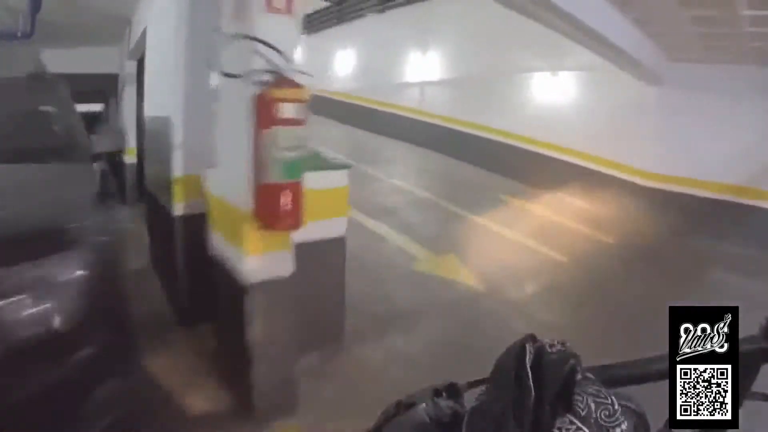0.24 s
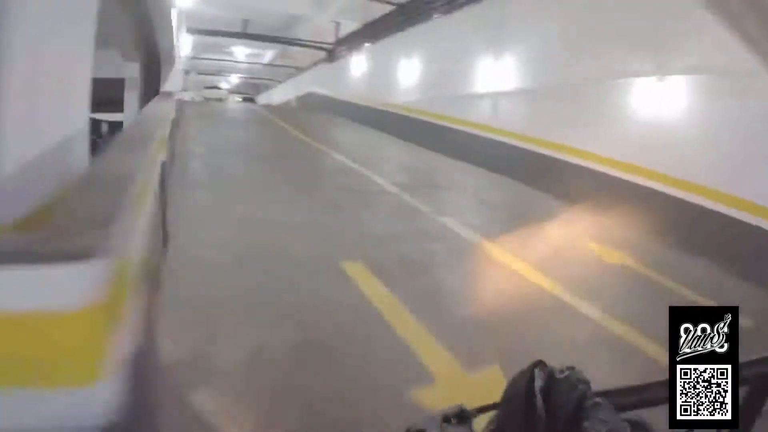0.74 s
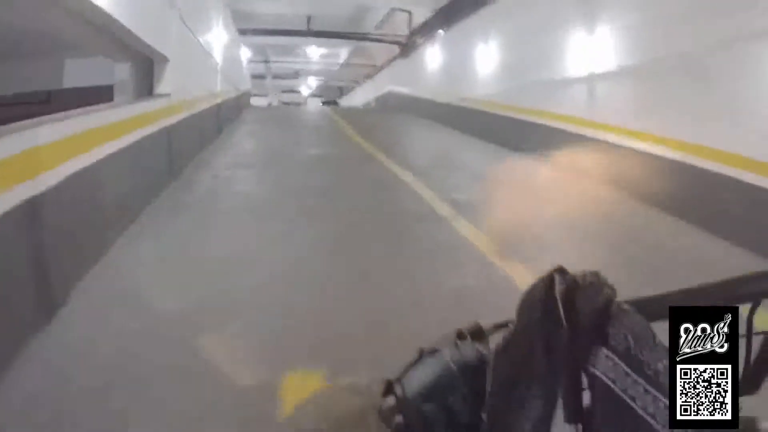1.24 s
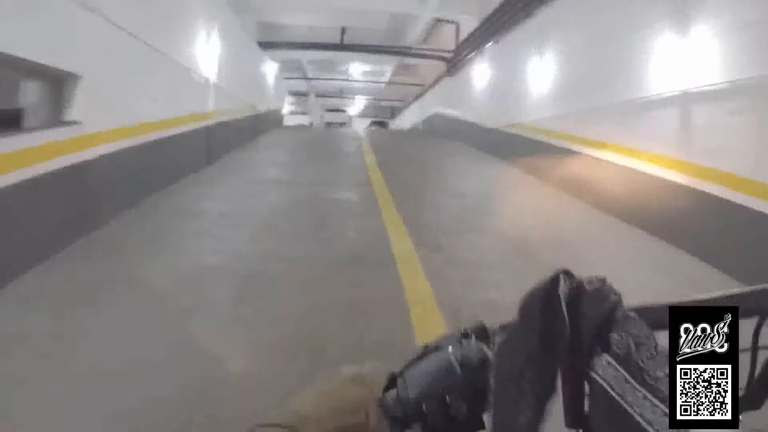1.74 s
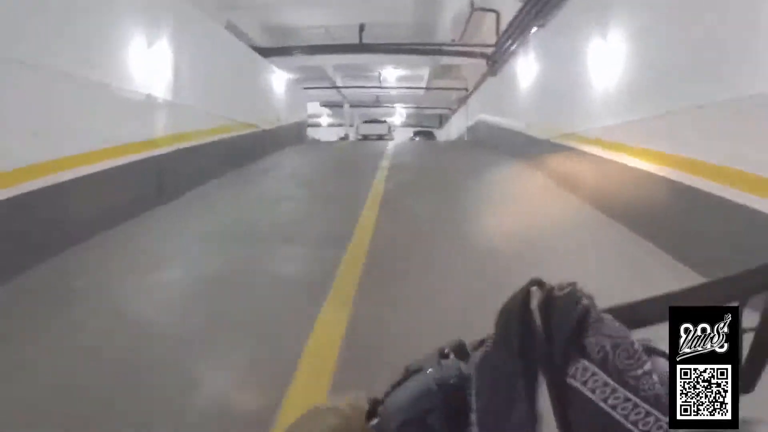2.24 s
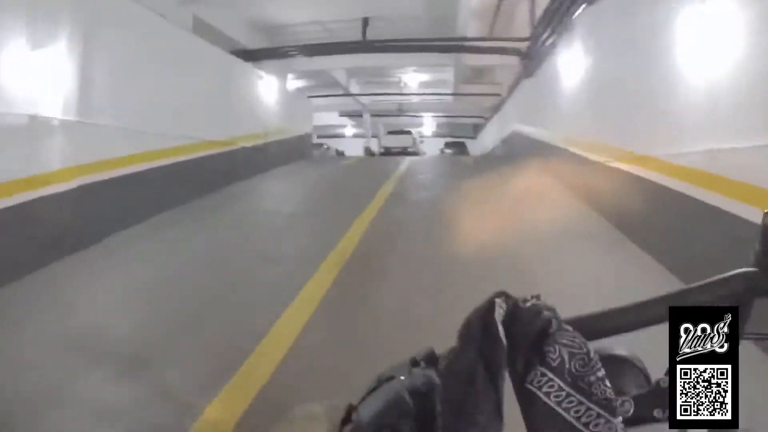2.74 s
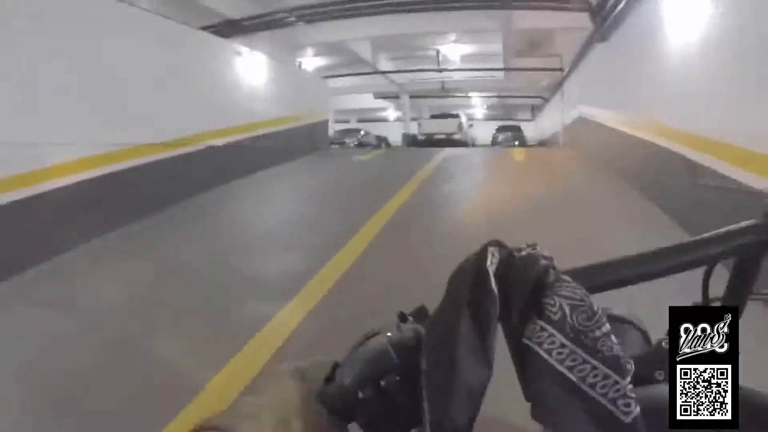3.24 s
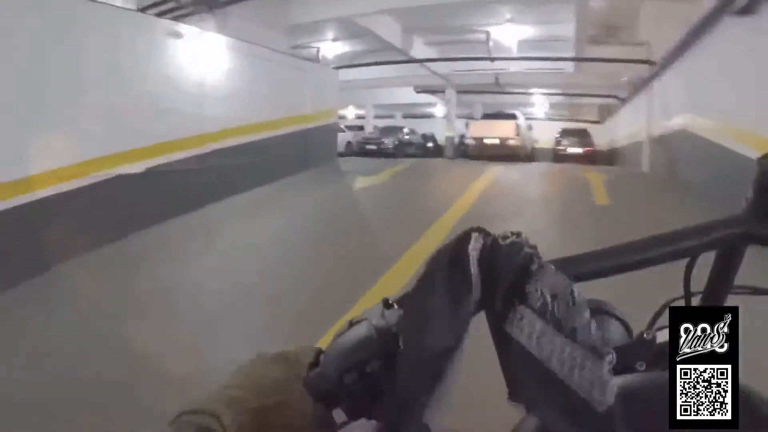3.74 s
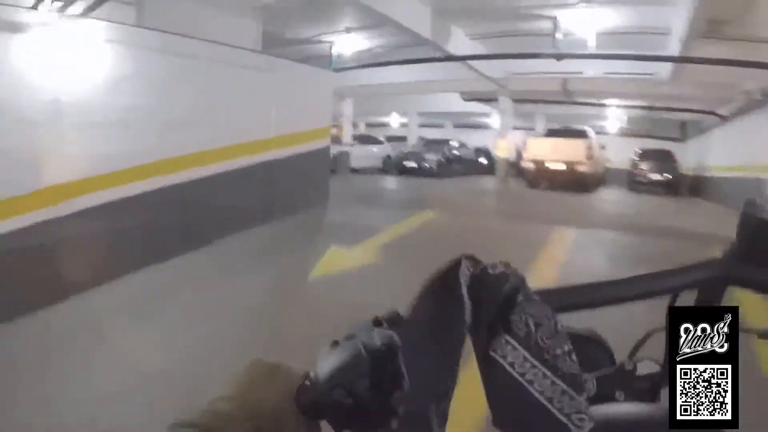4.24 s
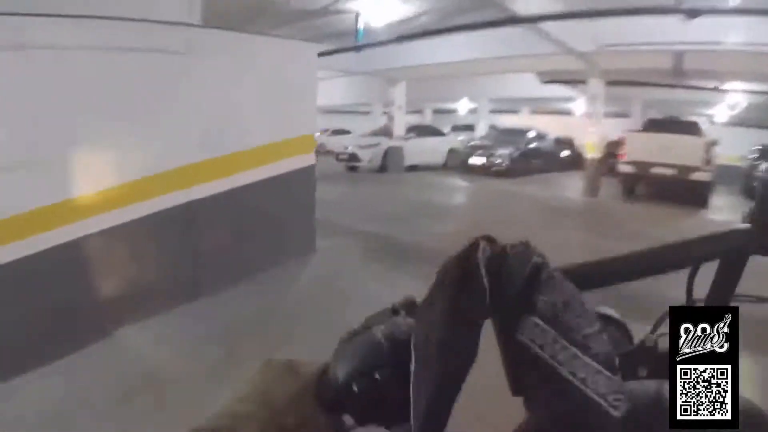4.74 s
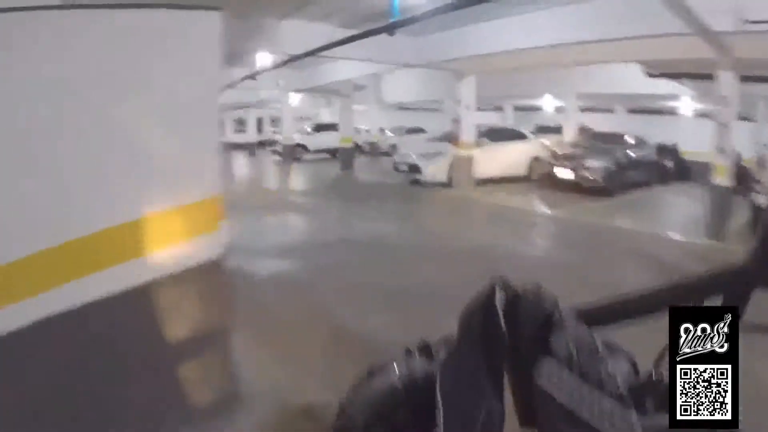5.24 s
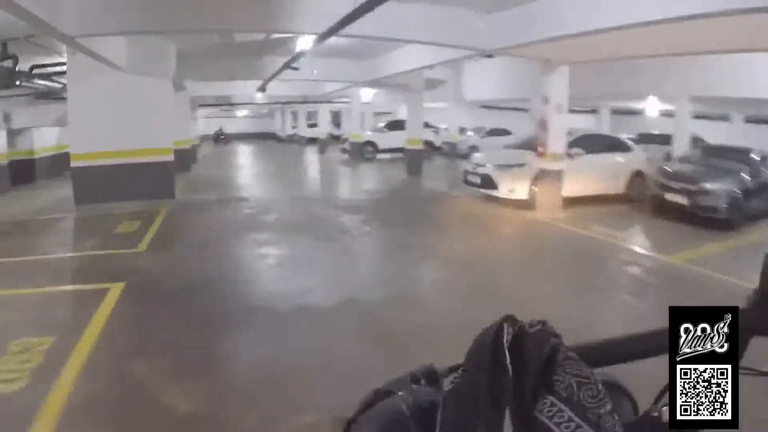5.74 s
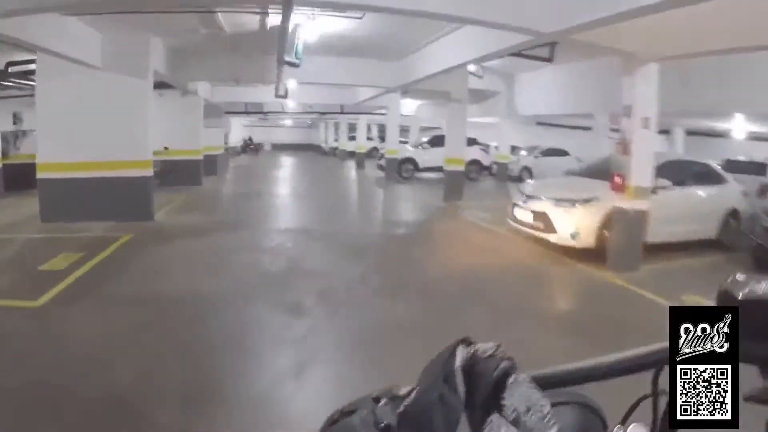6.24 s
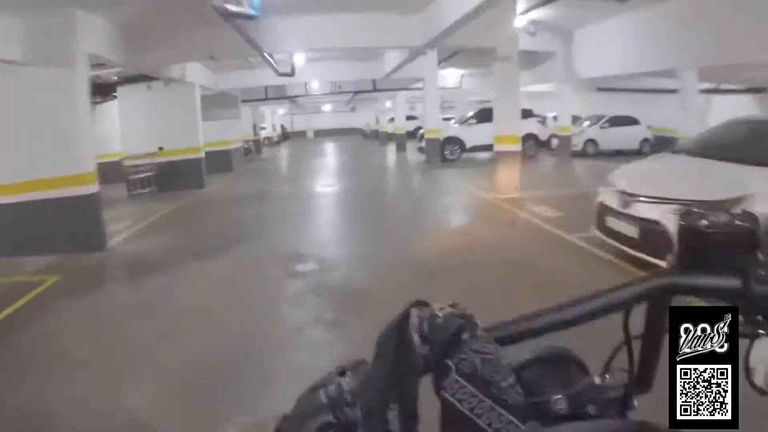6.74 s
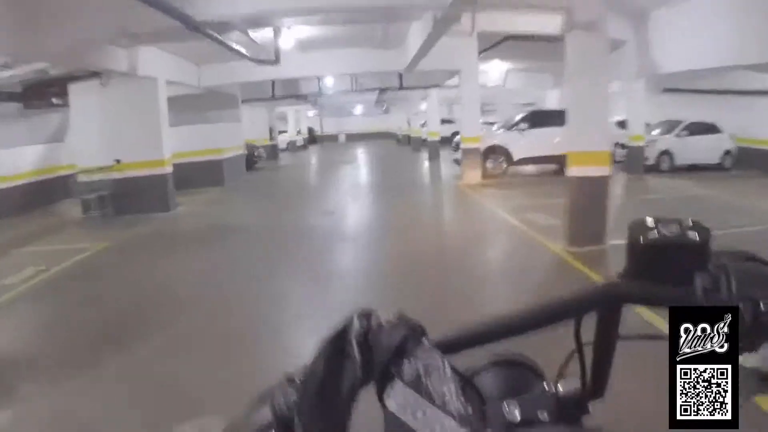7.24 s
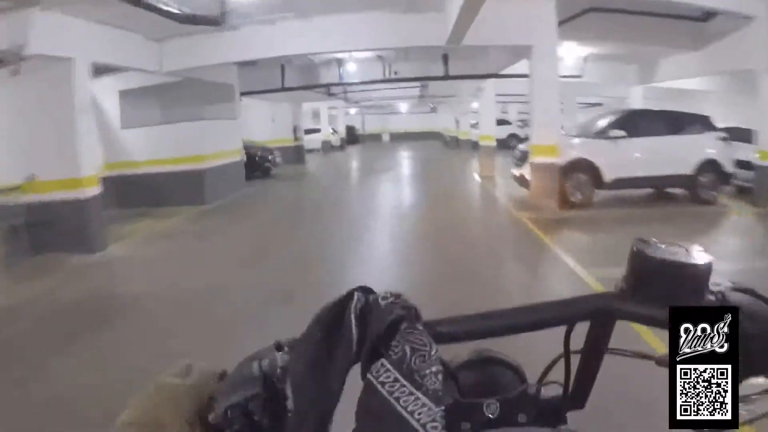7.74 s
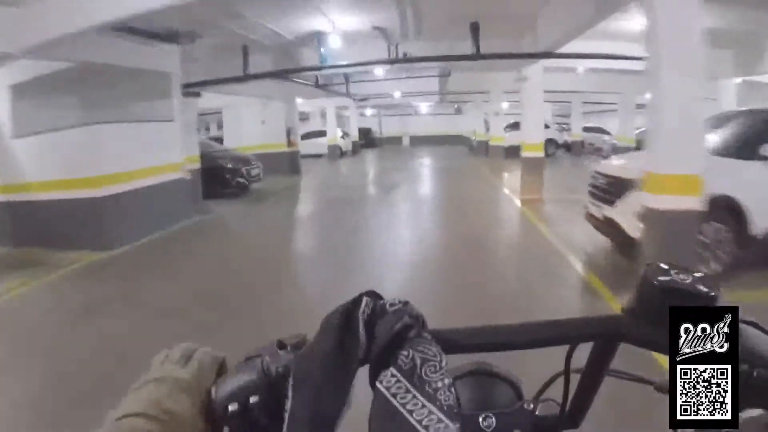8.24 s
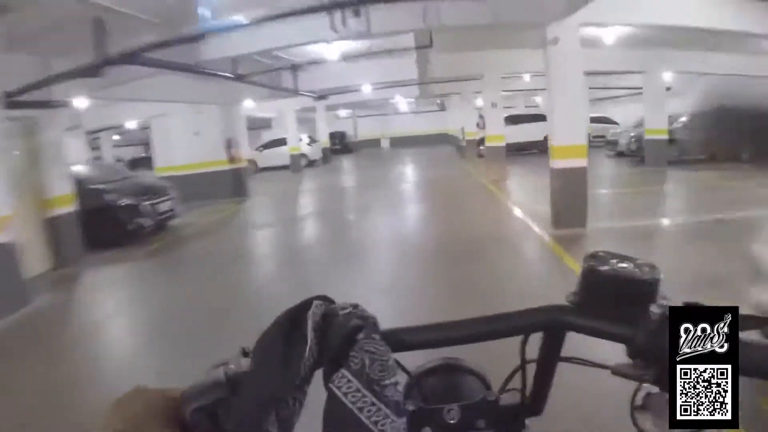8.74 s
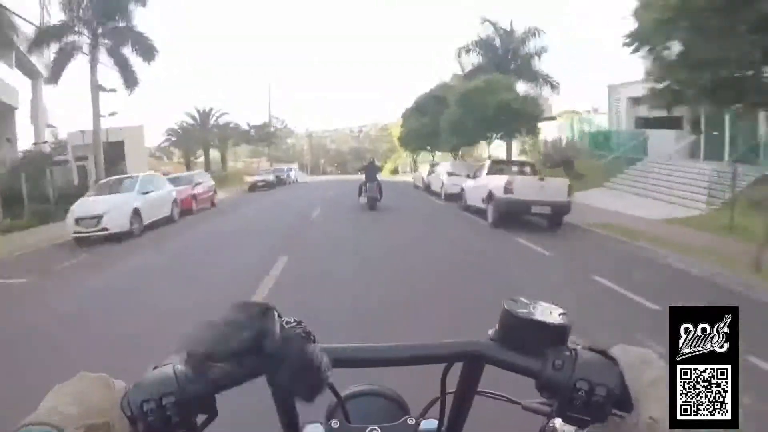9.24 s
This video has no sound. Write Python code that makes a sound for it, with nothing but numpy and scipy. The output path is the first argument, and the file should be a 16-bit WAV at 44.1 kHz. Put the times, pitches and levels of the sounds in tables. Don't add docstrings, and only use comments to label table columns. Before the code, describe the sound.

From the rider's seat, a big twin-cylinder motorcycle rumbles and rattles between concrete walls before a quick fade into gusty outdoor wind.

```python
import sys
import numpy as np
from scipy import signal
from scipy.fft import rfft, irfft, next_fast_len
from scipy.io import wavfile
from scipy.ndimage import uniform_filter1d

SR = 44100
rng = np.random.default_rng(int(sys.argv[2]) if len(sys.argv) > 2 else 0)


def digitize_waveform(pressure):
    field = np.atleast_2d(pressure).T
    bounded = np.clip(field, -1, 1)
    quanta = np.round(bounded * 32767).astype(np.int16)
    wavfile.write(sys.argv[1], SR, quanta)


def nominal_scale(level):
    x = np.asarray(level, float) / 20
    return 10 ** x


N = 418509
SIZE = next_fast_len(N)
TIME_S = np.arange(N) / SR
GARAGE_END_S, STREET_START_S = 8.974, 9.021

# t/s, full cycles per s (one cycle = two crank turns)
CYCLE_RATE = [(0, 14.65), (.42, 14.4), (.92, 12.65), (1.29, 13.1), (1.47, 11.6), (1.9, 12.15), (2.42, 13.3),
              (3.25, 15.2), (3.68, 15.55), (3.93, 14.85), (4.3, 15.8), (4.85, 15.95), (5.45, 15.05),
              (6.12, 10.85), (7.3, 15.8), (7.75, 16.55), (8.58, 15.95), (8.96, 16.6)]
# t/s, load as hiss level/dB
LOAD = [(0, -29.5), (.3, -33), (.85, -31.5), (1.2, -28), (1.62, -27), (3.6, -28), (4.47, -33), (4.8, -31.5),
        (5.65, -34), (6.42, -28.5), (7.04, -28.5), (7.65, -29.5), (8.17, -35), (8.36, -32), (8.62, -35),
        (8.76, -42.5), (8.84, -38), (8.9, -40)]
# t/s, level/dB
FADE = [
    (0, -11.5),
    (8.84, 2.5),
    (8.93, -10),
    (8.974, -26),
]
# multiple of the cycle rate, level/dB
WEAK_ORDERS = [(2, -41.5), (3, -46), (4, -35.5), (6, -32), (9, -25), (12, -30), (13, -27.5), (14, -29.5),
               (15, -39.5), (16, -31), (17, -35), (18, -41.5), (19, -32.5), (20, -33), (26, -41)]
STRONG_ORDERS = 5, 7, 8, 10, 11
STRONG_DB = [-27.5, -24.5, -25, -28.5, -28.5]
# f/Hz, width/Hz, lift/dB
PIPE = [(67, 3.8, 0), (78.5, 11, -1.5), (92, 6.6, 4.5), (171, 12, 4)]
# f/Hz, width/Hz, lift/dB
BOOM = (123.3, 22, 7.5)
SWELL_ORDERS = 5, 7, 8, 9, 10, 11, 12, 13
# t/s, length/s, level/dB
SWELLS = [
    [(2.03, 0.35, -21), (4.57, .4, -24), (7.44, 0.33, -22.5), (7.98, .2, -21)],
    [(2.45, 0.34, -15), (4.24, 0.1, -20), (4.9, 0.47, -22), (7.4, 0.57, -18), (8.38, 0.25, -19.5)],
    [(.3, 0.29, -12), (3.5, 0.55, -16.5), (5.15, 0.23, -18), (5.53, 0.083, -17.5), (7.18, 0.38, -17.5),
     (8.16, 0.18, -19)],
    [(.87, 0.36, -22), (5.77, 0.084, -12.5), (6.75, .25, -19.5)],
    [(1.48, 0.13, -19), (1.85, 0.38, -17.5), (3.1, 0.16, -20), (5.99, 0.22, -14), (6.42, 0.29, -15.5)],
    [(3.5, 0.97, -21), (4.6, 0.67, -17.5), (7.8, 0.44, -17.5), (8.52, 0.24, -16.5), (8.86, 0.11, -19)],
    [(.2, 0.446, -26)],
    [(2.95, 0.36, -22)],
]
# f/Hz, width/Hz, level/dB
TAIL_PIPE = [(245, 50, -1), (310, 45, -1), (417, 16, 2), (515, 60, 4), (680, 140, -8)]
# f/Hz, width/Hz, level/dB
CASES = [(1330, 190, -4.5), (1820, 150, -11), (2180, 220, -9), (2954, 220, -11), (3470, 600, -8),
         (4570, 460, -17)]
# t/s, length/s, lift/dB
PILLARS = [
    (4.8, .2, 6),
    (5.03, .2, 9),
    (6.8, .3, 9),
    (8.65, .06, 7),
]
REFLECTED = [1, 0, .5, 0, 1, 0]
# f/Hz, level/dB per Hz
ROAR = [(15, -22), (25, -13), (40, -18), (105, 0.5), (130, -0.5), (366, -19), (517, -19.5), (1060, -30.5),
        (1380, -32), (1650, -34.5), (3500, -32.5), (5200, -33.5), (7200, -27.5), (10500, -41),
        (14500, -47.5)]
# f/Hz, likeness 0-1, left minus right/dB
PORTS = [(60, 0.8, 5.5), (130, 0.78, 3.5), (335, 1, 2), (776, 0.6, 2), (1000, 0.65, -4), (1480, 0, -3),
         (2960, 0.38, -2), (6500, 0.27, 2.5), (9400, 0.47, 0.5), (13600, 0.13, 0)]
# f/Hz, phase/turns
LEAD = [(60, -.01), (340, -.05), (780, -.19), (1030, -.4), (1600, -1), (20000, -1)]
# t/s, wind level/dB
GUSTS = [
    (9.025, -31),
    (9.081, -16.5),
    (9.15, -13),
    (9.227, -15.5),
    (9.26, -12.5),
    (9.455, -18),
    (9.49, -7.5),
]
# f/Hz, level/dB per Hz
WIND = [(12, -38), (20, -4), (70, -3.5), (103, -3.5), (173, -8.5), (296, -16), (500, -20.5), (650, -49),
        (1100, -120)]
# f/Hz, level/dB per Hz
RUSH = [(240, -36), (400, -12), (438, -21), (540, -13), (750, -11.5), (1110, -18.5), (1590, -26),
        (2490, -26.5), (3020, -34), (6390, -48), (12200, -71.5), (14300, -64)]
# t/s, peak level/dB, f/Hz
SLAPS = [
    (9.095, -10, 151),
    (9.16, -7, 105),
    (9.173, -19, 1136),
    (9.215, -5, 310),
    (9.232, -7, 111),
    (9.287, -22, 1010),
    (9.345, -36, 940),
    (9.366, -11, 140),
    (9.462, -18.5, 1110),
]


def rms_one(x):
    return x / np.sqrt(np.mean(x ** 2) + 1e-20)


def in_time(rows):
    s, *columns = np.transpose(rows)
    return [np.interp(TIME_S, s, c) for c in columns]


def at_hz(points, hz):
    f, *columns = np.transpose(points)
    return [np.interp(np.log(np.maximum(hz, 1)), np.log(f), c) for c in columns]


def drift(rate_hz):
    r = np.exp(-80 * np.pi * rate_hz / SR)
    white = rng.standard_normal(N // 40 + 2002)
    slow = signal.lfilter([1], [1, -2 * r, r * r], white)[2000:]
    return np.interp(np.arange(N) / 40, np.arange(len(slow)), rms_one(slow))


def resonate(x, hz, width_hz):
    r = np.exp(-np.pi * width_hz / SR)
    zeros = np.array([1, 0, -1]) * (1 - r * r) / 2
    return signal.lfilter(zeros, [1, -2 * r * np.cos(2 * np.pi * hz / SR), r * r], x)


def coloured(spectrum):
    shape = nominal_scale(at_hz(spectrum, np.fft.rfftfreq(SIZE, 1 / SR))[0])
    return rms_one(irfft(rfft(rng.standard_normal(SIZE)) * shape, SIZE)[:N])


def throb(pulses, decay_s):
    return signal.lfilter([1], [1, -np.exp(-1 / (decay_s * SR))], pulses)


def street():
    wind_db, = in_time(GUSTS)
    after = TIME_S - 9.13
    rise_and_sag_db = np.minimum(130 * after, -15.5 * after)
    rush_db = -23.5 + 0.35 * wind_db + rise_and_sag_db
    wind = nominal_scale(wind_db + 2.0 * drift(25)) * coloured(WIND)
    rush = nominal_scale(rush_db + 2.1 * drift(30)) * coloured(RUSH)
    return (wind + rush) * np.clip((TIME_S - STREET_START_S) / .002, 0, 1)


def slaps():
    out = np.zeros(N)
    t = np.arange(int(.05 * SR)) / SR
    for s, db, hz in SLAPS:
        start = int(s * SR)
        ring = nominal_scale(db) * np.exp(-t * np.sqrt(hz) * 6.1) * np.sin(2 * np.pi * hz * t)
        out[start:][:len(t)] += ring[:N - start]
    return out


def garage(x, t60_s):
    x = x * (TIME_S < GARAGE_END_S)
    w, spectrum = 2 * np.pi * np.fft.rfftfreq(SIZE), rfft(x, SIZE)
    lags = (rng.uniform(.02, .07, (2, 4)) * SR).astype(int)
    sides = []
    for side in lags:
        loops = [nominal_scale(-60 * d / SR / t60_s) * np.exp(-1j * w * d) for d in side]
        sides.append(irfft(spectrum * sum(g / (1 - g) for g in loops), SIZE)[:N])
    return sides


def roar(pulses, pulling, knock, hiss_db, breath_db, clatter_db):
    beat = throb(pulses, 0.011)
    beat = beat / uniform_filter1d(beat, SR // 4) - 1
    noise = np.array([coloured(ROAR), coloured(ROAR)])
    below_240, below_900, below_4200 = [
        signal.lfilter(*signal.butter(2, hz, fs=SR), noise) for hz in (240, 900, 4200)]
    rumble = below_240 * nominal_scale(in_time(FADE)[0] - 9 + 1.1 * drift(4))
    breath = (below_900 - below_240) * nominal_scale(breath_db + 21.5) * (1 + 0.15 * beat)
    clatter = (below_4200 - below_900) * nominal_scale(clatter_db + 30.5) * (1 + (0.05 + 0.28 * knock) * beat)
    hiss_depth = 0.11 * (1 - pulling) + 0.075 * knock
    hiss = (noise - below_4200) * nominal_scale(hiss_db + 28.5 + 0.87 * drift(10.0)) * (1 + hiss_depth * beat)
    return nominal_scale(-11.5) * (rumble + breath + clatter + hiss)


def throttle(rate):
    load_db, = in_time(LOAD)
    fade_db = (in_time(FADE)[0] - FADE[1][1]) * (TIME_S > 8.84)
    extra_load_db = load_db + 30
    hiss_db = load_db + 0.76 * fade_db
    bark_db = -24 + 0.054 * extra_load_db - 0.44 * (rate - 14) + 0.69 * fade_db
    clatter_db = -30.5 + 0.52 * extra_load_db + 0.76 * fade_db
    return hiss_db, bark_db, clatter_db


def firings(cycles, pulling):
    count = int(cycles[-1])
    chance = rng.standard_normal((2 * count, 2))
    second_firing = 5 / 12
    turn = np.repeat(np.arange(count), 2) + np.tile([0, second_firing], count) + .004 * chance[:, 0]
    at = np.clip(np.searchsorted(cycles, turn), 0, N - 1)
    weak = np.arange(2 * count) % 4 > 0
    lope_db = -8 * weak * (1 - pulling[at])
    pulses = np.zeros(N)
    pulses[at] = nominal_scale(np.tile([0, -1.5], count) + lope_db + 1.1 * chance[:, 1])
    return pulses


def cases(pulses, drive_by_firing, clatter_db):
    near_db = sum(db * np.exp(-(2 * (TIME_S - s) / length) ** 2) for s, length, db in PILLARS)
    rattle = rng.standard_normal(N) * (rng.random(N) < 900 / SR)
    drive = rms_one(rattle) + .65 * drive_by_firing * rms_one(pulses)
    rung = 0
    for (hz, width_hz, db), share in zip(CASES, REFLECTED):
        ring_db = db + share * near_db + 3.5 * drift(2.5)
        rung = rung + nominal_scale(ring_db) * rms_one(resonate(drive, hz, width_hz))
    return nominal_scale(clatter_db - 4.5) * rung


def bark(pulses, bark_db):
    burst = throb(pulses, 0.012) * rng.standard_normal(N)
    drive = uniform_filter1d(pulses, 30) + .018 * burst
    rung = 0
    for k, (hz, width_hz, db) in enumerate(TAIL_PIPE):
        sign = (-1) ** k
        rung = rung + sign * nominal_scale(db) * rms_one(resonate(drive, hz, width_hz))
    return nominal_scale(bark_db - 2.5) * rms_one(rung)


def order_levels(rate):
    t, levels = np.arange(0, N, 64) / SR, []
    crests = dict(zip(SWELL_ORDERS, SWELLS))
    for k, db in list(WEAK_ORDERS) + list(zip(STRONG_ORDERS, STRONG_DB)):
        for hz, width_hz, lift_db in list(PIPE) + [BOOM]:
            db = db + lift_db / (1 + (2 * (k * rate[::64] - hz) / width_hz) ** 2)
        gain = nominal_scale(db)
        for s, length, top_db in crests.get(k, []):
            gain = gain + nominal_scale(top_db) * np.exp(-(2 * (t - s) / (length + 0.083)) ** 4)
        levels.append((k, np.interp(TIME_S, t, 20 * np.log10(gain))))
    return levels


def drone(rate, cycles):
    out = 0
    for k, level_db in order_levels(rate):
        phase = 2 * np.pi * (k * cycles + rng.random())
        out = out + np.sqrt(2) * nominal_scale(level_db + 1.97 * drift(2.4)) * np.sin(phase)
    return out * nominal_scale(in_time(FADE)[0] * (TIME_S > 8.9) * 0.62)


def ports(common, apart):
    hz, side = np.fft.rfftfreq(SIZE, 1 / SR), np.array([[1], [-1]])
    alike, balance_db = at_hz(PORTS, hz)
    alike = np.clip(alike, 0, 1)
    shared = np.sqrt((1 + alike) / 2) * rfft(common, SIZE)
    own = side * np.sqrt((1 - alike) / 2) * rfft(apart, SIZE)
    lead = np.exp(1j * np.pi * side * at_hz(LEAD, hz)[0])
    return irfft((shared + own) * nominal_scale(side * balance_db / 2) * lead, SIZE)[:, :N]


def scene():
    rate = uniform_filter1d(in_time(CYCLE_RATE)[0], int(.145 * SR))
    cycles = np.cumsum(rate) / SR
    hiss_db, bark_db, clatter_db = throttle(rate)
    pulling = np.clip((hiss_db + 32) / 4, 0, 1)
    pulses = firings(cycles, pulling)
    barks = bark(pulses, bark_db + 2.5 * (pulling - .5))
    breath_db = bark_db - 4 * (pulling - .5)
    knock = np.clip((hiss_db + 29.5) / 2, 0, 1) * np.clip((rate - 12.5) / 2, 0, 1)
    metal = cases(pulses, 2.2 * knock + .8 * (1 - pulling), clatter_db)
    echoes = nominal_scale(-15.5) * np.array(garage(barks, t60_s=1.27))
    common, apart = roar(pulses, pulling, knock, hiss_db, breath_db, clatter_db) + echoes
    ride = ports(drone(rate, cycles) + barks + metal + common, apart + np.roll(metal, SR // 7))
    closing = np.clip((GARAGE_END_S - TIME_S) / 0.0055, 0, 1)
    return ride * closing + street() + slaps()


def treble_gate(x, limit_db, spread_db, from_hz):
    turn = np.array([[1, 0.7], [1, -0.96]])
    hz, t, lines = signal.stft(turn @ x / 2, SR, "cosine", nperseg=2048, noverlap=1024)
    patches = np.repeat(rng.standard_normal((65, lines.shape[2])), 16, axis=0)[:len(hz)]
    treble = (np.mean(abs(lines[0, hz > from_hz]) ** 2, axis=0) / 1e-6) ** .3
    slope = np.clip(hz / from_hz - 1, 0, 1)[:, None]
    limit = nominal_scale(limit_db + spread_db * patches) * slope * treble * (t < GARAGE_END_S)
    grain = nominal_scale(1.8 * np.roll(patches, 7, axis=1) * (hz > 1200)[:, None])
    kept = grain * lines * (abs(lines) > limit)
    return turn @ signal.istft(kept, SR, "cosine", nperseg=2048, noverlap=1024)[1]


def roll_off(x):
    return signal.sosfilt(signal.butter(12, 14490, fs=SR, output="sos"), x)


def record(dry):
    shift = 355
    rounded = np.pad(1.15 * np.tanh(dry / 1.15), [(0, 0), (shift, 0)])
    thinned = treble_gate(rounded, limit_db=-62, spread_db=6.5, from_hz=3800)[:, shift:shift + N]
    mix = np.where(TIME_S > STREET_START_S, thinned.mean(axis=0), thinned)
    mix = signal.sosfilt(signal.cheby2(18, 50, 14400, fs=SR, output="sos"), mix)
    return roll_off(mix)


dry = scene()
out = record(dry)
digitize_waveform(out)
```